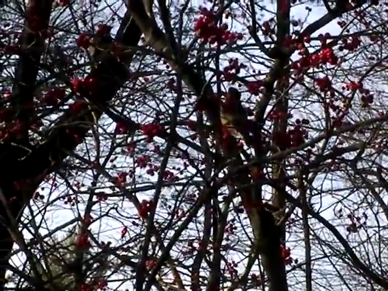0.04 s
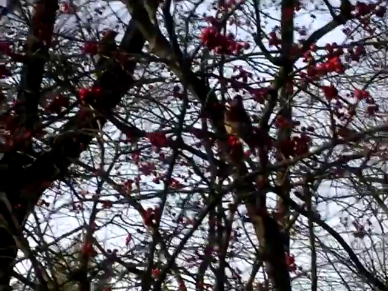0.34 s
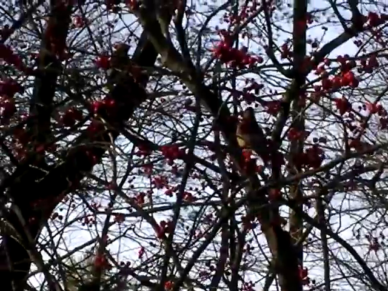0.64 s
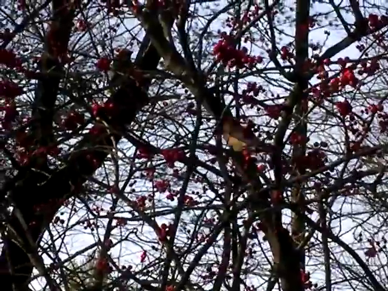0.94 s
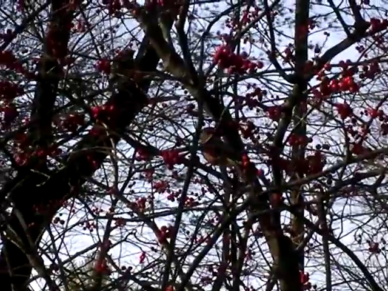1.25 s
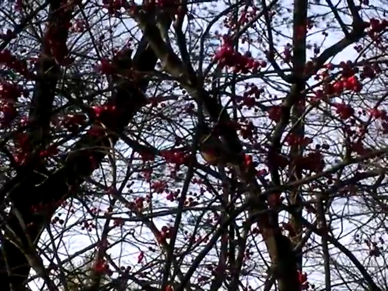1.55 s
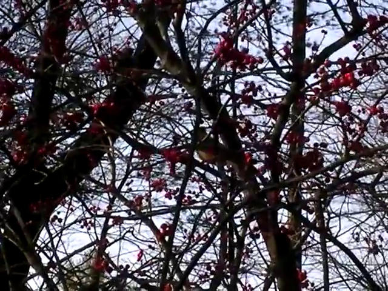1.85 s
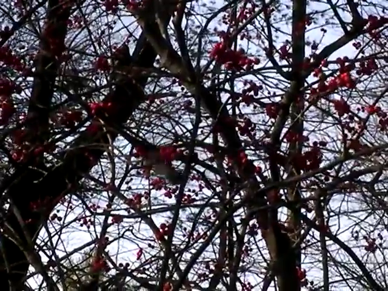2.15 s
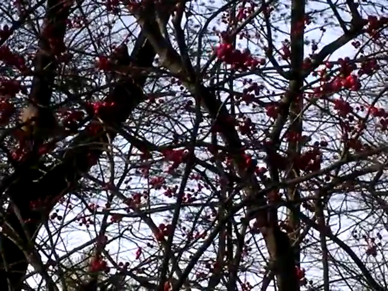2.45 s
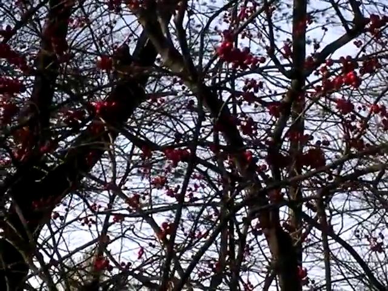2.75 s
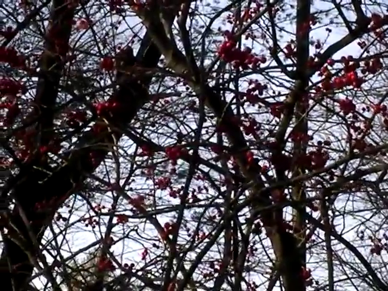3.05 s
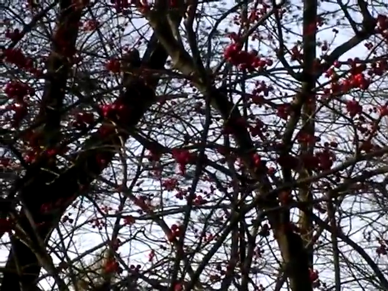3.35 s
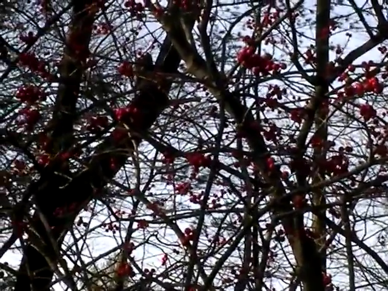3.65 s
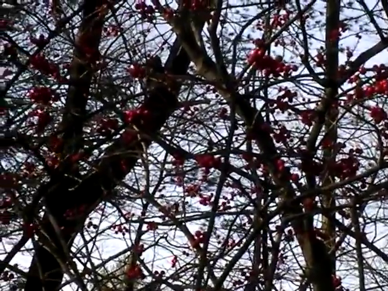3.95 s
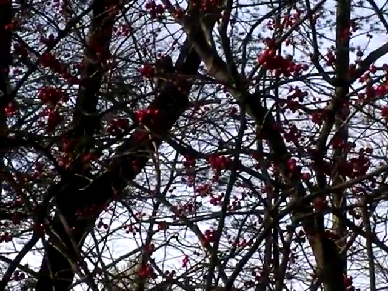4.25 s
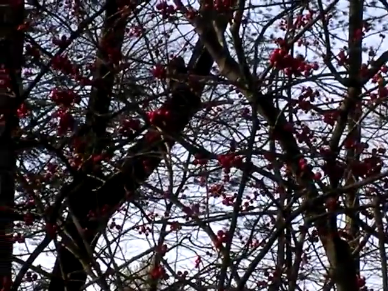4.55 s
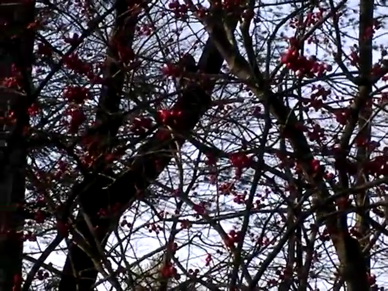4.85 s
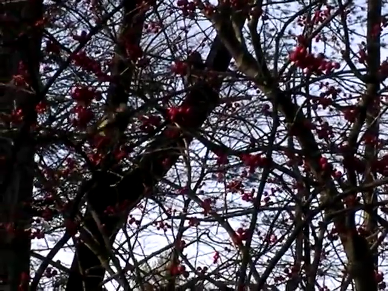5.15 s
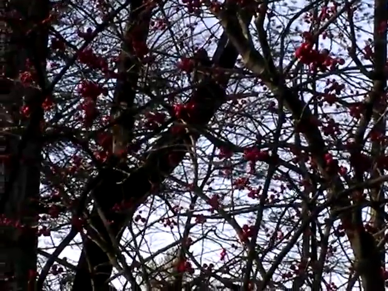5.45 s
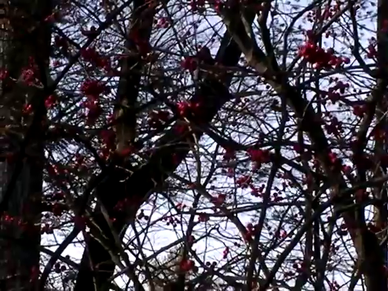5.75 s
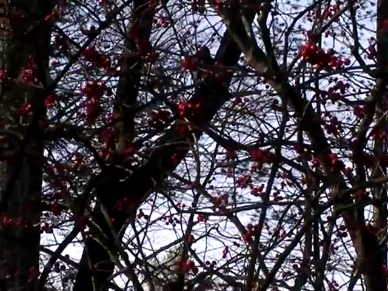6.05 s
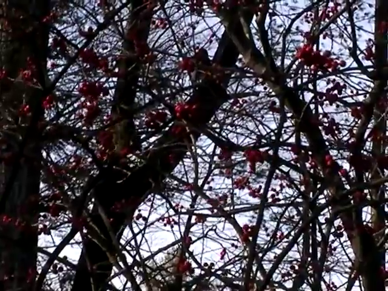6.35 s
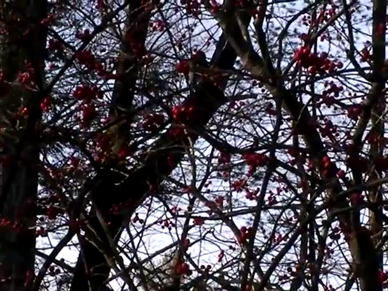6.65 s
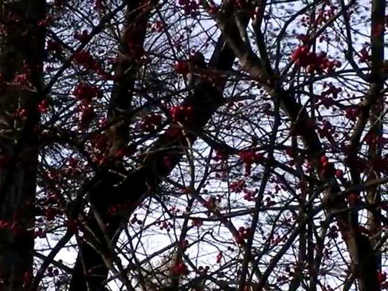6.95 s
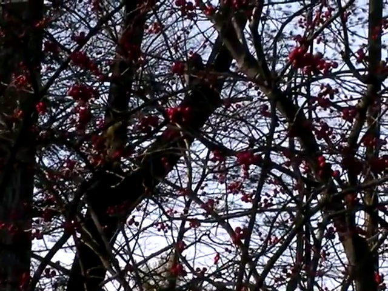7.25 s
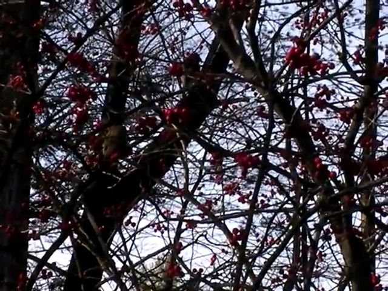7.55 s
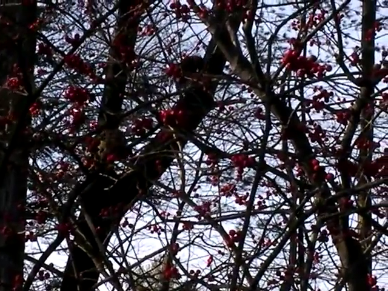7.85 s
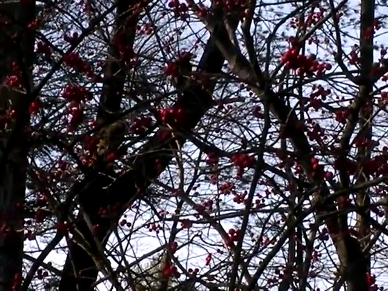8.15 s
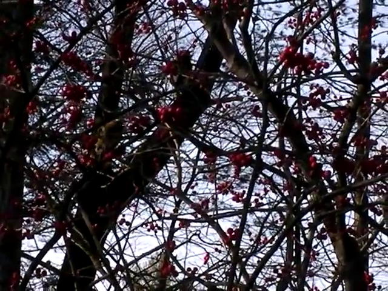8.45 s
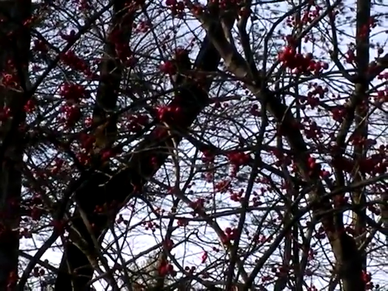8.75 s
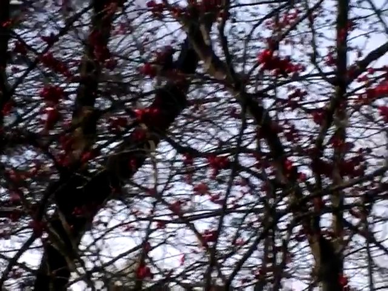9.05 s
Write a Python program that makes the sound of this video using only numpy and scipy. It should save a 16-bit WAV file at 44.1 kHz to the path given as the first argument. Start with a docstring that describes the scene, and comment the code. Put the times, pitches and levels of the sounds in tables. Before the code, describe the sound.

Light wind buffets the microphone in low rumbling gusts while small birds give thin, high whistles and short trills over a faint hiss.

```python
"""Under a berry tree on a cold, quiet day, light gusts buffet the two microphone ports of a camera.
Turbulence at each port makes a low rumble, and single eddies strike as pulses of pressure.
Small birds give thin high whistles and short trills and flick the twigs; trunks and branches
scatter these sounds into a brief echo. Behind them lie a far wash like distant traffic
and the hiss of the microphone."""
import sys
import numpy as np
from scipy import signal
from scipy.fft import rfft, irfft
from scipy.io import wavfile
from scipy.ndimage import uniform_filter1d

SR = 44100
rng = np.random.default_rng(int(sys.argv[2]) if len(sys.argv) > 2 else 0)


def transcribe(u):
    """Save the signal u as a 16-bit wav file named by the first command-line argument.

    u: samples, shape (n,) or (channels, n), limited to [-1, 1]; the rate is SR.
    q: integer samples, one column per channel.
    """
    v = np.clip(np.atleast_2d(u).T, -1, 1)
    q = np.round(v * 32767).astype(np.int16)
    wavfile.write(sys.argv[1], SR, q)


N = 400869
TIME = np.arange(N) / SR


def undb(db):
    """Amplitude grows tenfold for every 20 dB."""
    return 10 ** (np.asarray(db) / 20)


def unit(x):
    """Normalisation to an rms of 1."""
    return x / np.sqrt(np.mean(x ** 2))


def noise(spectrum, channels=2):
    """Spectral shaping of white noise gives uncorrelated channels with a joint rms of 1."""
    hz, db = np.transpose(spectrum)
    gain = undb(np.interp(np.log(np.fft.rfftfreq(N, 1 / SR) + 1), np.log(hz), db))
    return unit(irfft(rfft(rng.standard_normal((channels, N))) * gain, N))


def resonance(x, hz, width_hz):
    """Two equal resonators in cascade select one band, scaled to an rms of 1."""
    b, a = signal.iirpeak(hz, hz / width_hz, fs=SR)
    return unit(signal.lfilter(b, a, signal.lfilter(b, a, x)))


def butter(x, hz, kind):
    """A second-order low-pass or high-pass falls 12 dB per octave beyond its corner."""
    return signal.sosfilt(signal.butter(2, hz, kind, fs=SR, output="sos"), x)


def wander(rate_hz):
    """Random steps, smoothed twice, give a modulation with a spread near 1."""
    hold = int(SR / rate_hz)
    steps = np.repeat(rng.standard_normal(N // hold + 1), hold)
    return 1.66 * uniform_filter1d(uniform_filter1d(steps, hold), hold)[:N]


def add(track, start_s, sound):
    """Superposition: a sound adds to the track from its start time on."""
    i = max(int(start_s * SR), 0)
    track[..., i:i + sound.shape[-1]] += sound[..., :max(N - i, 0)]


# Spectrum of the hiss. Each row: frequency in Hz, relative spectral density in dB.
HISS_SPECTRUM = [(20, 11.5), (60, 8.5), (120, 3.5), (300, 7), (800, 6), (2000, 4), (5000, 3), (7000, 6),
                 (9500, 3.5), (12000, -2), (15000, -4.5)]

def microphone_hiss(level_db=-54.5):
    """Self-noise is steady and independent in the two channels."""
    return noise(HISS_SPECTRUM) * undb(level_db)


# Spectrum of the far wash. Each row: frequency in Hz, relative spectral density in dB.
WASH_SPECTRUM = [(25, -21), (70, -6), (120, -14), (175, -4), (300, -4), (550, -2), (800, -2.5), (1100, -5),
                 (1400, -3.5), (1700, -3), (2000, -8), (2850, -23), (4500, -18.5), (9000, -47)]
# Narrow humps in the wash. Each row: centre in Hz, width in Hz, level in dB.
WASH_HUMPS = [(1653, 320, -65.5), (2413, 550, -68), (3194, 470, -69)]

def far_wash(level_db=-55, flicker_db=0.6):
    """Path difference: a distant wash, slightly to the left, reaches the right port a moment later."""
    wash = noise(WASH_SPECTRUM, channels=1)[0] * undb(level_db)
    for hz, width_hz, db in WASH_HUMPS:
        wash += undb(db) * resonance(rng.standard_normal(N), hz, width_hz)
    wash *= undb(flicker_db * wander(13))
    return np.array([wash, np.roll(wash, 1)])


def tree_echo(sound, t60_s=0.39, wet_db=-1):
    """Scattering by trunks and branches adds a short diffuse echo, different on each side."""
    t = np.arange(SR // 2) / SR
    response = rng.standard_normal((2, len(t))) * np.exp(-np.log(1000) * t / t60_s)
    response /= np.sqrt(np.sum(response ** 2, axis=1, keepdims=True))
    return sound + undb(wet_db) * signal.fftconvolve(sound[None], response, axes=1)[:, :N]


# Twigs flicked by birds. Each row: start in seconds, level in dB, pitch in Hz, decay time in seconds.
TWIG_FLICKS = [(.109, -56, 10610, 0.024), (.11, -55, 5200, .03), (.474, -56.5, 5000, .004),
               (1.03, -56, 9800, .011), (2.099, -47, 9400, .003), (2.146, -42, 9700, 0.0018),
               (2.15, -62, 9500, .078), (2.675, -53, 10200, .004), (3.259, -50, 5200, 0.0055),
               (5.52, -66, 9600, .07), (5.579, -52, 8750, .006)]

def twigs(width_hz=3200, crackle_db=2.5):
    """Exponential decay of a noise band: a fast one is a dry tick, a slow one a soft rustle."""
    out, t = np.zeros(N), np.arange(SR // 3) / SR
    for start_s, db, hz, decay_s in TWIG_FLICKS:
        grains = rng.standard_normal(len(t)) * undb(crackle_db * wander(400)[:len(t)])
        add(out, start_s, undb(db) * resonance(grains, hz, width_hz) * np.exp(-t / decay_s))
    return out


# Thin whistles. Each row: start and length in seconds, top pitch in Hz, level in dB,
# rise time in seconds.
BIRD_WHISTLES = [(0.49, .2, 6795, -58, .02), (6.11, .215, 6850, -62.5, 0.027), (8.932, .2, 6820, -56, 0.07)]

def whistles(flutter_db=2, waver=0.0025, scoop_hz=350, drop_hz=120, release_s=0.033):
    """Random modulation makes a pure tone quiver; it slides up as it swells and droops as it ends."""
    out = np.zeros(N)
    for start_s, length_s, top_hz, db, rise_s in BIRD_WHISTLES:
        swell = 1 - np.exp(-np.maximum(TIME - start_s, 0) / rise_s)
        ending = np.clip((TIME - start_s - length_s) / release_s + 1, 0, 1)
        hz = top_hz - scoop_hz * (1 - swell) - drop_hz * ending
        phase = 2 * np.pi * np.cumsum(hz * (1 + waver * wander(170))) / SR
        out += np.sqrt(2) * np.sin(phase) * swell * (1 - ending) * undb(db + flutter_db * wander(63))
    return out


def chip(top_hz, length_s=0.0172, arch=0.16):
    """Frequency modulation in one quick arch: the pitch rises, rests at its top and falls."""
    position = np.linspace(-1, 1, int(length_s * SR))
    hz = top_hz * (1 - arch * np.abs(position) ** 3)
    return np.sqrt(1 - position ** 2) * np.sin(2 * np.pi * np.cumsum(hz) / SR)


# Short trills. Each row: start in seconds, number of notes, top pitch in Hz, level in dB,
# position of the loudest point in notes counted from 0.
BIRD_TRILLS = [(1.447, 2, 7400, -51, 0), (2.068, 2, 7400, -50.5, .6), (5.38, 4, 7260, -52, 1.4),
               (6.977, 1, 7200, -51, 0), (7.046, 5, 7400, -43, 1.6), (8.647, 3, 7030, -50.5, 0)]

def trills(period_s=0.0402, fade_db=4, sag_hz=45, stray_hz=45, between_db=-8, between_hz=380):
    """A periodic train of notes swells, fades and sinks; a softer, higher note falls between each two."""
    out = np.zeros(N)
    for start_s, count, top_hz, db, loudest in BIRD_TRILLS:
        for k in range(round(count)):
            hz = top_hz - sag_hz * k + stray_hz * rng.standard_normal()
            gain = undb(db - fade_db * abs(k - loudest))
            add(out, start_s + k * period_s, gain * chip(hz))
            if k:
                add(out, start_s + (k - 0.5) * period_s, gain * undb(between_db) * chip(hz + between_hz))
    return out


def port_shares(pan_db):
    """Constant-power panning: two power weights with a mean of 1, the left pan_db above the right."""
    return unit(undb(np.array([[pan_db], [-pan_db]]) / 2)) ** 2


# The light breeze between gusts. Each row: time in seconds, level in dB.
BREEZE_LEVELS = [(0, -54), (1.33, -51), (1.45, -75), (2.35, -81), (2.5, -60), (3.15, -53.5), (3.3, -63),
                 (4.0, -60), (4.5, -50), (5.45, -54.5), (5.6, -71), (6.0, -70), (6.5, -61), (6.95, -46.5),
                 (7.45, -49.5), (7.65, -73), (8.2, -69), (8.6, -54.5)]
# Gusts at the ports. Each row: start and length in seconds, level in dB, left minus right in dB.
PORT_GUSTS = [(0.021, 0.16, -35.5, -9.5), (0.191, 0.17, -34.5, 18), (0.542, 0.16, -33, 16),
              (0.698, .03, -30.5, -18), (0.788, 0.054, -35.5, -19.5), (0.847, 0.06, -34.5, 3),
              (0.972, 0.11, -46, -8), (1.142, .11, -37, -1), (1.259, 0.043, -40.5, -10.5),
              (2.45, 0.026, -47, -7), (2.557, .035, -51, -7), (2.821, .025, -48, 5.5),
              (2.984, 0.15, -49.5, -5), (3.398, 0.018, -46.5, -16), (3.574, 0.27, -37.5, -5),
              (3.889, 0.059, -36, -2), (4.13, 0.036, -34.5, 0), (4.19, 0.064, -35.5, -8.5),
              (4.281, .12, -44, -15), (4.88, 0.024, -48.5, 1), (5.09, .04, -47, -10.5),
              (6.239, 0.051, -42, -9), (6.636, 0.054, -38, -7.5), (6.761, 0.099, -39.5, 0),
              (7.032, 0.072, -33, 0), (7.165, 0.037, -29.5, -10), (7.224, 0.038, -42.5, -2),
              (7.339, 0.078, -41.5, 0.5), (7.544, .012, -42, 18), (8.465, 0.053, -40.5, 7.5),
              (8.925, .07, -42.5, -1.5)]

def airflow(breeze_pan_db=-3, attack_s=0.009, release_s=0.019, sag_db_per_s=25):
    """Incoherent sources add in power: breeze and slackening gusts give each port's level in dB."""
    breeze_db = np.interp(TIME, *np.transpose(BREEZE_LEVELS))
    power = undb(breeze_db) ** 2 * port_shares(breeze_pan_db)
    for start_s, length_s, db, pan_db in PORT_GUSTS:
        age = TIME - start_s
        envelope = np.exp(np.minimum(age, 0) / attack_s - np.maximum(age - length_s, 0) / release_s)
        sag_db = sag_db_per_s * np.clip(age, 0, length_s)
        power += (undb(db - sag_db) * envelope) ** 2 * port_shares(pan_db)
    return 10 * np.log10(power)


# Spectrum of the turbulent pressure. Each row: frequency in Hz, relative spectral density in dB.
EDDY_SPECTRUM = [(20, -33), (45, -9), (70, 4), (105, 3.5), (170, 1.5), (330, -12.5), (480, -23),
                 (700, -31.5), (1100, -33), (2500, -63)]

def turbulence(air_db, trim_db=-2, patchy_db=2.5, crossover_hz=230, knee_db=-43, breakup_db=-42):
    """Each port has its own turbulence; faster air carries smaller eddies and sounds brighter."""
    eddies = unit(noise(EDDY_SPECTRUM) * undb(patchy_db * np.array([wander(55) for port in range(2)])))
    large, small = butter(eddies, crossover_hz, "low"), butter(eddies, crossover_hz, "high")
    small_gain = np.clip(0.5 + 0.045 * (air_db - knee_db), 0, 1)
    # Strong gusts break up into single buffets, so the even rumble grows more slowly.
    rumble_db = air_db - 0.27 * np.maximum(air_db - breakup_db, 0)
    return (large - small_gain * small) * undb(rumble_db + trim_db)


def shed_eddies(air_db, gap_s=0.03, onset_db=-50, excess_db=8, scatter_db=2):
    """Vortex shedding: lesser eddies, stronger and sharper in a gust, as rows like STRONG_EDDIES."""
    rows = []
    for port in range(2):
        for k, (jitter, strength, sharpness) in enumerate(rng.standard_normal((1000, 3))):
            time_s = (k + jitter / 3) * gap_s
            db = air_db[port, int(time_s * SR)] if 0 < time_s < TIME[-1] else onset_db
            if db > onset_db:
                peak_db = db + excess_db + scatter_db * strength
                sharp_db = -17 + 0.69 * (db - onset_db) + 3 * sharpness
                rows.append((time_s, peak_db, port, sharp_db))
    return rows


# The strongest single eddies. Each row: time in seconds, peak level in dB, port (0 left, 1 right),
# sharpness in dB (higher is narrower).
STRONG_EDDIES = [(.032, -23.5, 1, -11), (.168, -18, 1, -4.5), (.559, -17.5, 0, -8.5), (.708, -14, 1, -4),
                 (.723, -14, 1, -3), (.861, -16, 1, -6), (.883, -15, 0, -7), (.926, -21, 0, -5),
                 (1.22, -18.5, 1, -10), (1.225, -18, 0, -13), (3.089, -32.5, 1, -18), (3.724, -25, 1, -13),
                 (3.899, -20.5, 1, 2.5), (4.127, -18.5, 0, -10), (4.158, -19, 0, -2), (4.165, -17.5, 1, -5),
                 (4.658, -34.5, 1, -4), (6.818, -24.5, 0, -18), (7.051, -19.5, 1, -7.5),
                 (7.113, -12, 1, -5.5), (7.183, -16.5, 1, -7), (8.474, -25.5, 0, -20)]

def buffets(lesser_eddies, base_width_s=0.0009, sharpening=0.49, leak_hz=118):
    """A vortex crosses one port as a pressure pulse, which swings back as the pressure leaks away."""
    out, t = np.zeros((2, N)), np.arange(-SR // 50, SR // 25) / SR
    signs = rng.choice([-1, 1], 2000)
    for (time_s, peak_db, port, sharp_db), sign in zip(STRONG_EDDIES + lesser_eddies, signs):
        width_s = base_width_s * undb(-sharpening * sharp_db)
        pulse = 1 / (1 + (t / width_s) ** 2) ** 2  # a pointed core with wide skirts
        pulse = butter(butter(pulse, leak_hz, "high"), leak_hz, "high")
        add(out[int(port)], time_s + t[0], sign * undb(peak_db) * pulse / np.abs(pulse).max())
    return out


def scene():
    """Hiss, far wash, birds and wind superpose; only the birds and their twigs echo among the trees."""
    hiss = microphone_hiss()
    air_db = airflow()
    wind = turbulence(air_db) + buffets(shed_eddies(air_db))
    birds = tree_echo(whistles() + trills() + twigs())
    return hiss + far_wash() + birds + wind


# The camera's notch filters, low then high. Each row: centre in Hz, width in Hz.
CAMERA_NOTCHES = [(240, 87), (7980, 1276)]

def record(dry):
    """Filters in cascade: the camera notches a low band once, a high band twice, and cuts the top."""
    low, high = (signal.iirnotch(hz, hz / width_hz, fs=SR) for hz, width_hz in CAMERA_NOTCHES)
    out = dry
    for notch in (low, high, high):
        out = signal.lfilter(*notch, out)
    cutoff_hz = 15050
    return signal.sosfilt(signal.ellip(12, 0.2, 70, cutoff_hz, fs=SR, output="sos"), out)


dry = scene()
out = record(dry)
transcribe(out)
```